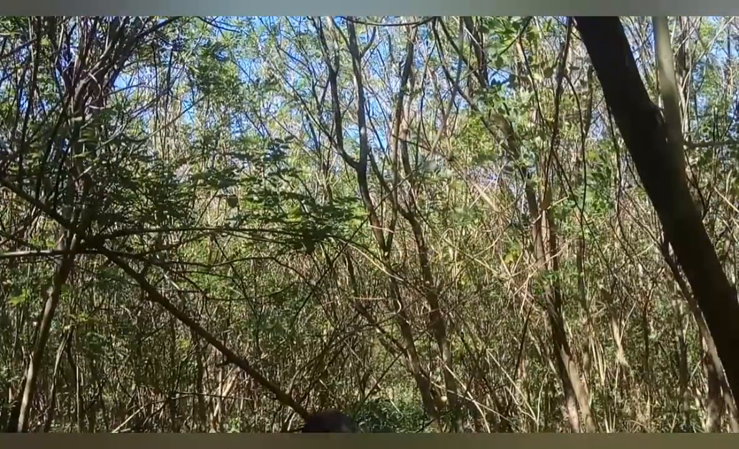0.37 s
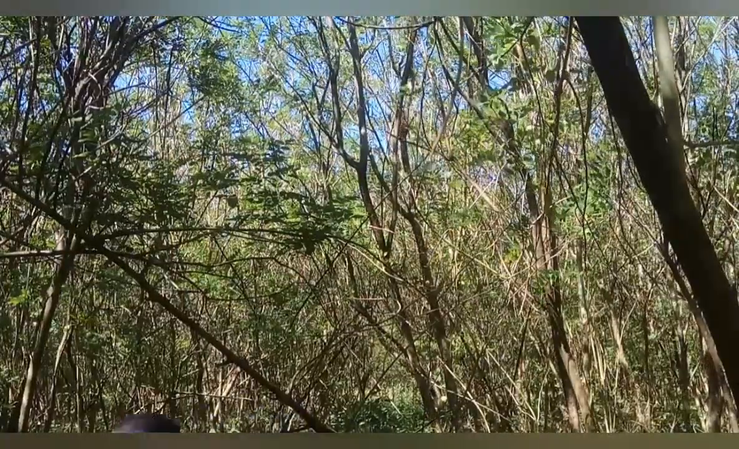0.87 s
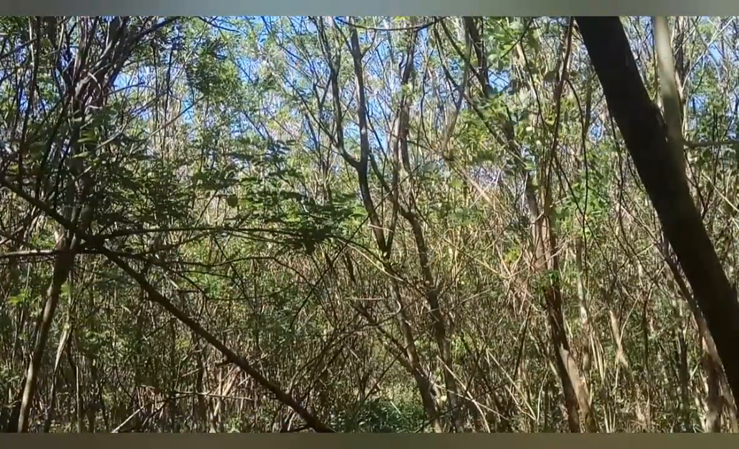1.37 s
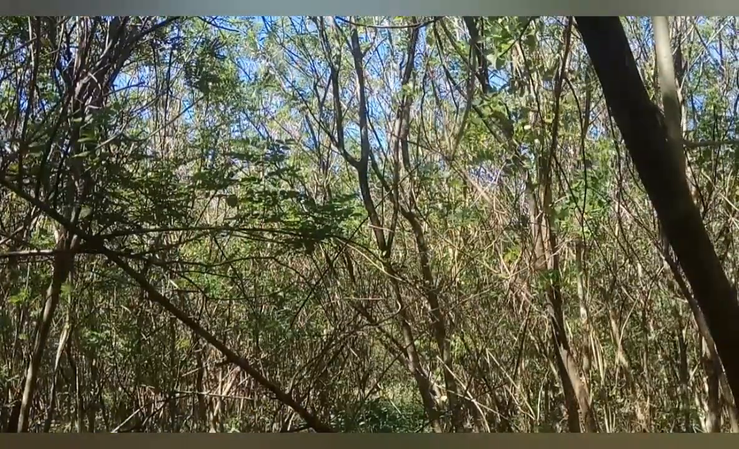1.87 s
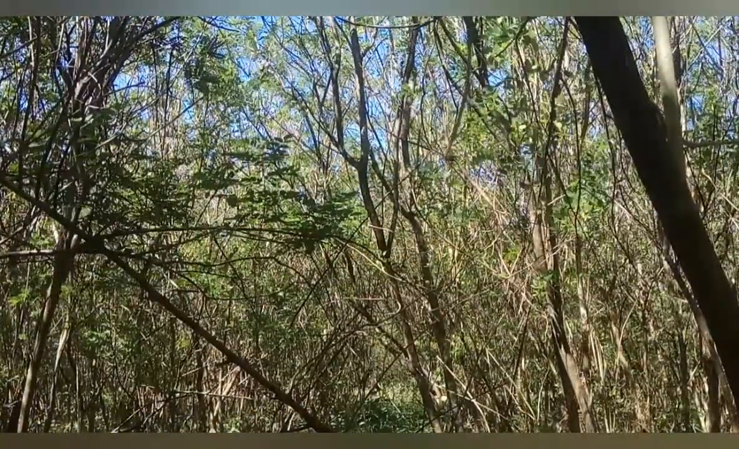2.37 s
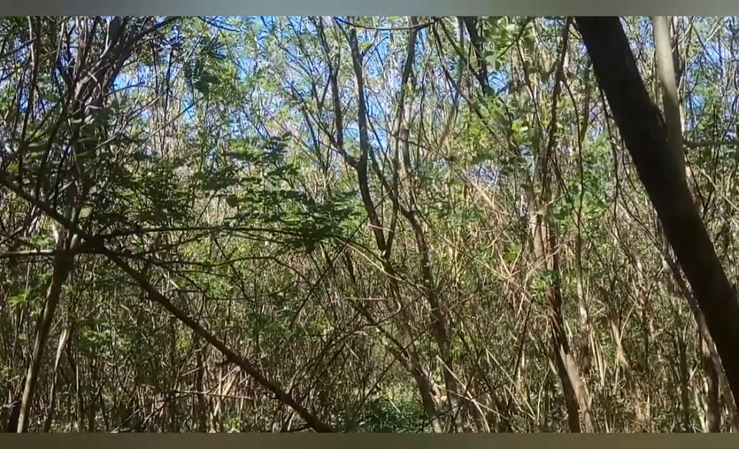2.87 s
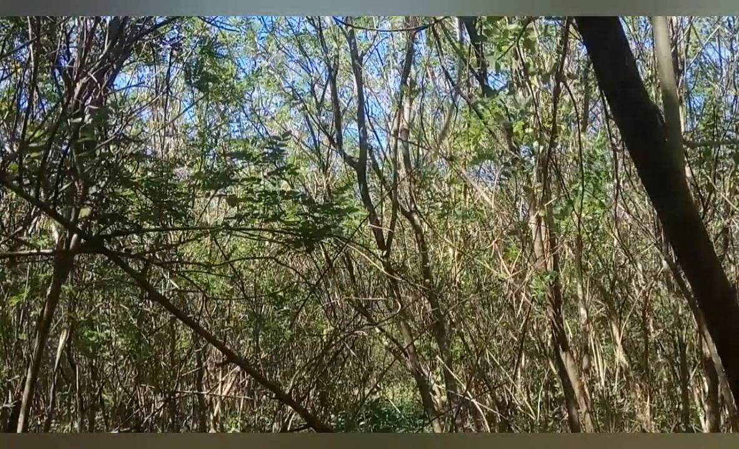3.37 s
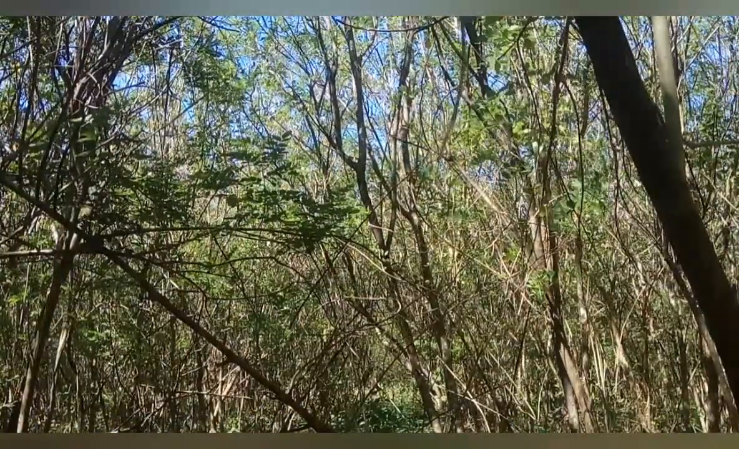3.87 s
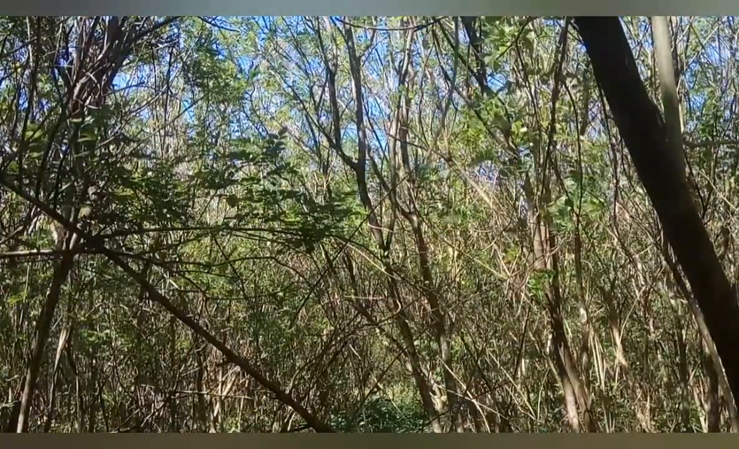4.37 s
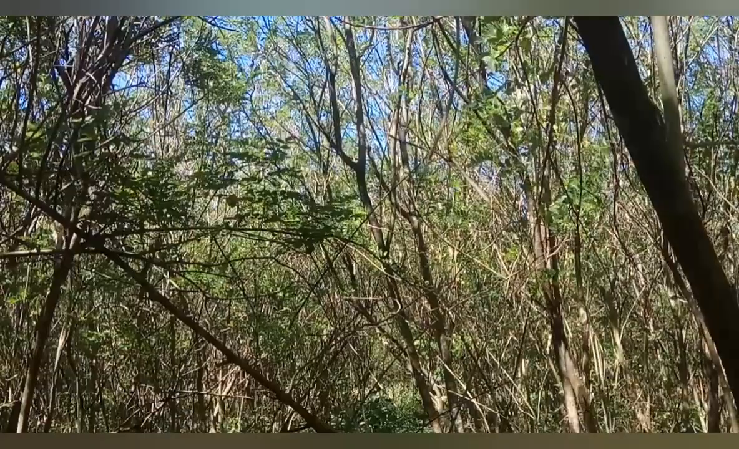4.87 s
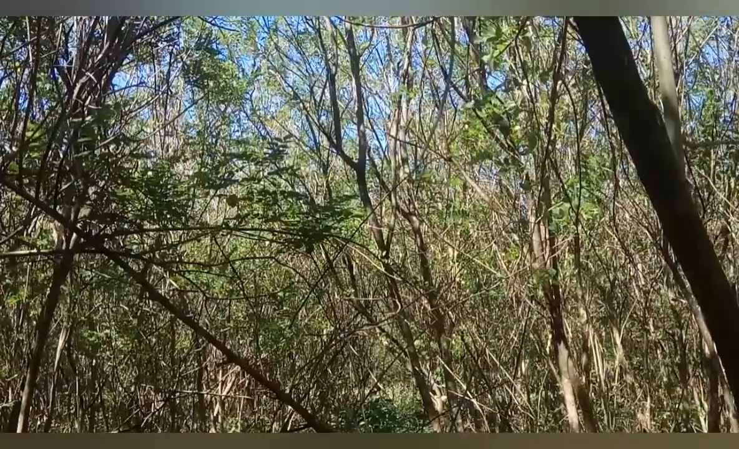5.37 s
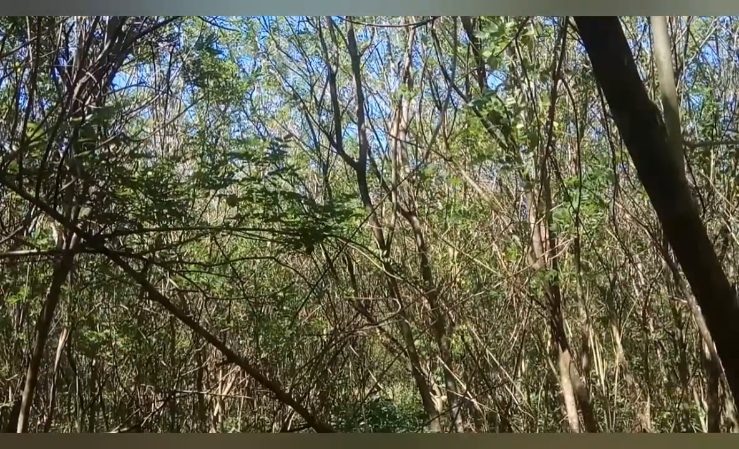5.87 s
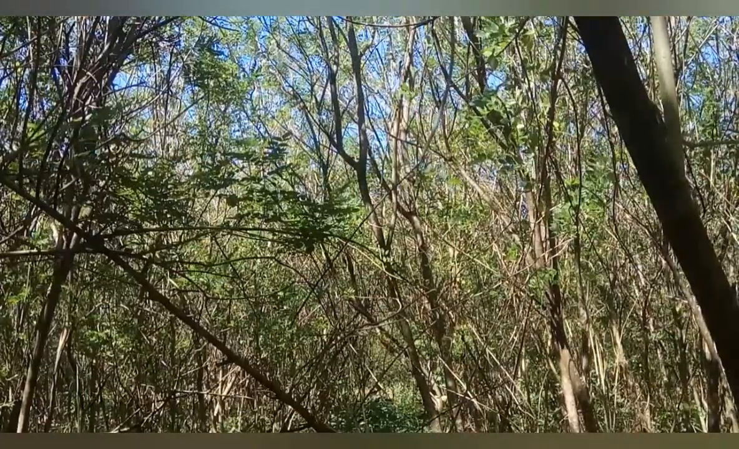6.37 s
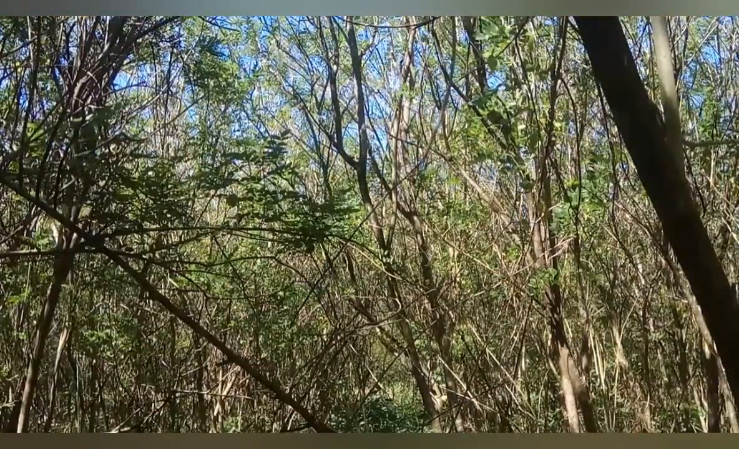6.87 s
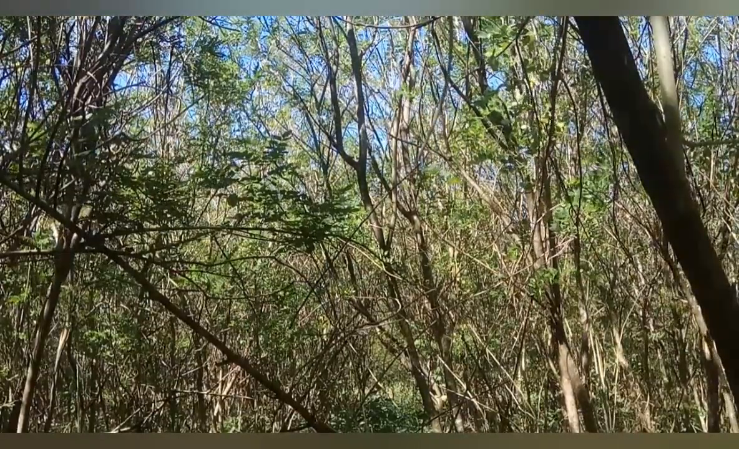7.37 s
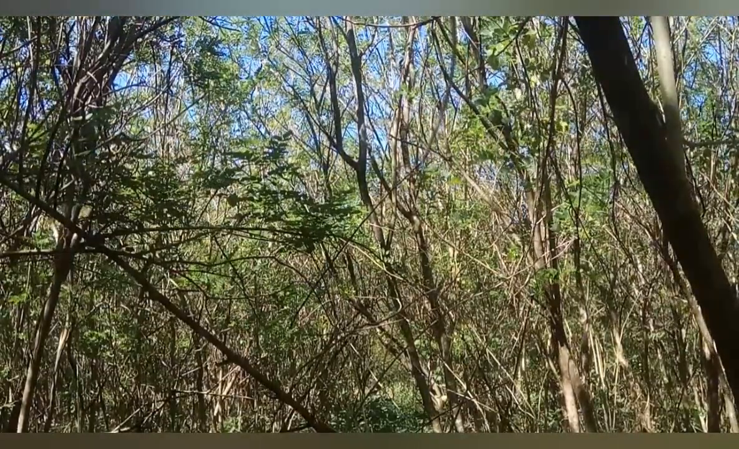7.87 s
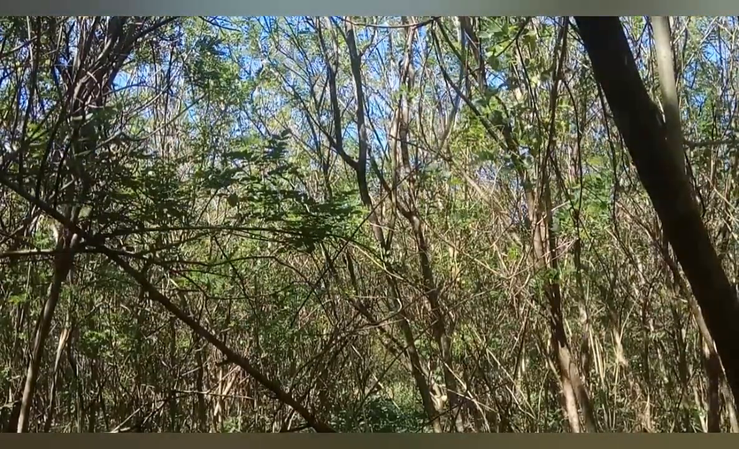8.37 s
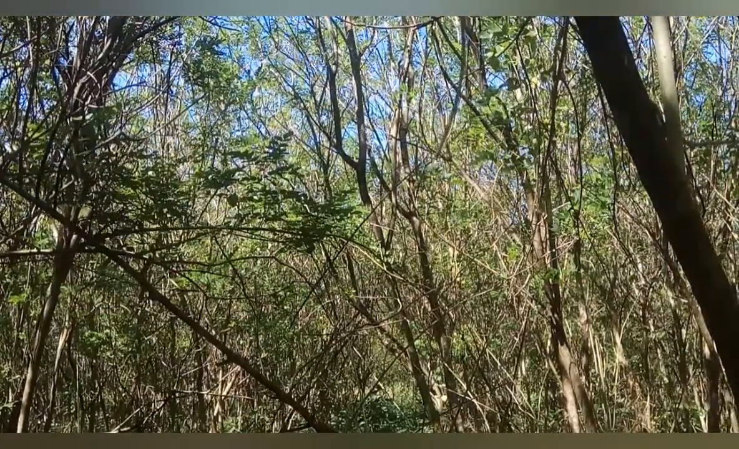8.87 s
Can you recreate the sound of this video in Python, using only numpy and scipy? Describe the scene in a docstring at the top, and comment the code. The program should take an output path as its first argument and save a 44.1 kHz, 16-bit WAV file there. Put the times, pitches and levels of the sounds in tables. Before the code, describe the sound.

Many small songbirds chatter in dense buzzy trills and clear bending whistles, over faint insect hiss, rustling leaves, snapping twigs and a distant engine.

```python
"""Songbirds in a thicket, heard by two microphones, the left a little first.
From the start, buzzy trills (fast-swept tones, breath and tiny chirps) chatter over faint insect hiss, a far
engine built from orders of its firing rate, and coloured noise for the air. At once clear gliding sine
whistles and chips join in, then leaves stir in bursts of crackling noise. Twigs snap as short decaying tones
from 2.6 s on; at 6.4 s one low rattling call of even notes is heard."""
import sys
import numpy as np
from scipy import signal
from scipy.fft import rfft, irfft, next_fast_len
from scipy.io import wavfile
from scipy.ndimage import uniform_filter1d, map_coordinates

SR = 44100
rng = np.random.default_rng(int(sys.argv[2]) if len(sys.argv) > 2 else 0)


def unload_wav(signal):
    """Save mono or channel-first audio to the path in sys.argv[1] as 16-bit WAV at rate SR, clipped to [-1, 1]."""
    wavfile.write(
        sys.argv[1],
        SR,
        np.round(np.clip(np.atleast_2d(signal).T, -1, 1) * 32767).astype(np.int16),
    )


def makeup_ratio(level_db):
    """Linear amplitude ratio for a level in decibels (20 dB per factor of ten)."""
    decades = np.asarray(level_db, float) / 20
    return 10 ** decades


N = 407484   # length [samples]

# phrases of evenly spaced buzzy syllables:
# (start [s], syllables [count], period [s], high voice level [dB], low voice level [dB])
PHRASES = [(.002, 2, 0.091, -32, -33.5), (0.213, 1, 0.14, -22.5, -29.5), (0.372, 2, .1, -27.5, -25),
           (.574, 5, 0.11, -24.5, -25), (1.164, 3, 0.11, -26.5, -28), (1.64, 1, 0.14, -30.5, -28),
           (1.859, 6, 0.12, -30.5, -29.5), (2.519, 7, 0.11, -26, -29), (3.27, 3, 0.12, -26.5, -24.5),
           (3.655, 5, 0.11, -27, -28), (4.205, 2, .1, -26.5, -27.5), (4.457, 3, 0.1, -24, -31),
           (4.798, 4, 0.11, -28.5, -29), (5.225, 1, 0.086, -31, -32), (5.334, 3, 0.12, -25.5, -29.5),
           (5.72, 6, 0.11, -22.5, -29), (6.406, 6, 0.12, -28.5, -27), (7.099, 1, .12, -28, -38.5),
           (7.2, 1, 0.092, -50, -30), (7.462, 4, 0.11, -29, -32), (7.915, 2, 0.1, -28, -29),
           (8.192, 1, 0.066, -49, -28.5), (8.353, 1, 0.15, -31.5, -34.5), (8.46, 4, 0.094, -26.5, -27.5),
           (8.912, 1, 0.12, -24.5, -23.5), (9.06, 1, 0.14, -27, -27), (9.194, 1, 0.079, -24.5, -27)]
# spectra of the two trilling voices: (frequency [Hz], density [dB per Hz])
HIGH_TRILL_COLOUR = [(5000, -2), (5600, 2.5), (6000, 4), (6500, 2.5), (6950, -1.5), (7150, -10),
                     (7600, -15), (7800, -89)]
LOW_TRILL_COLOUR = [(1800, -21), (2600, -10.5), (3300, -2), (4200, 0), (4600, 2), (5100, 0), (5600, -1.5),
                    (6400, -8)]
# air spectrum: (frequency [Hz], density [dB per Hz])
AIR_COLOUR = [(25, -12.5), (80, -1), (150, 4.5), (400, 3.5), (800, -12.5), (1500, -14.5), (3000, -26),
              (7300, -2), (7700, -52)]
# air loudness: (time [s], level [dB])
AIR_LEVEL = [(0, -42), (4.5, -48.5), (5.3, -47.5), (7.5, -51.5), (9.24, -43)]
# engine: (time [s], firing rate [Hz], low thrum level [dB], upper orders level [dB])
ENGINE = [(0, 59.8, -43, -39), (.7, 62.9, -46, -44), (.92, 63.26, -59, -49), (1.15, 66.4, -41, -49),
          (1.35, 66.95, -55, -47), (1.7, 53.87, -62, -57.5), (2.05, 54.7, -49.5, -50.5),
          (3.5, 53.72, -46, -54), (4.9, 51.33, -49.5, -56), (5.25, 50.44, -72, -67),
          (6.15, 49.15, -49, -49), (7, 49.8, -53.5, -50.5), (7.55, 49.15, -59.5, -60.5),
          (7.92, 49.06, -52.5, -43.5), (9.24, 52.62, -47.5, -40)]
# exhaust resonance: (frequency [Hz], level [dB])
EXHAUST_COLOUR = [(40, -27), (150, -19.5), (200, -13), (300, -11.5), (400, -3.5), (470, -16), (700, -23.5)]
# steady insect hiss: (time [s], level [dB])
INSECTS = [(0, -43), (2, -45.5), (4.3, -46.5), (4.5, -52.5), (6.7, -45.5), (7, -51.5), (9.24, -51)]
# leaves stirred: (time [s], level [dB])
LEAF_STIRS = [(0.49, -44), (.905, -55), (1.973, -53), (2.549, -38), (2.947, -41), (3.154, -42.5),
              (3.681, -36), (3.77, -41.5), (3.863, -42), (4.089, -42), (4.211, -36.5), (4.99, -42),
              (6.051, -42), (6.71, -55), (7.8, -53), (7.92, -60), (8.47, -53), (8.92, -61), (9.174, -37)]
# spectrum shared by insects and leaves: (frequency [Hz], density [dB per Hz])
RUSTLE_COLOUR = [(500, -2), (1200, -2), (3000, 3.5), (7400, 0), (8200, -3), (9300, 2), (13300, -2),
                 (13800, -29), (14500, 9.5), (15400, 10), (15900, -75)]
# repeated whistled notes: (time of the mark [s], level [dB], pitch factor [ratio])
HOOKS = [(.027, -24, 0.99), (.217, -25.5, 1.0), (.41, -26, 1), (4.972, -24, 0.98), (5.171, -24, .994),
         (5.354, -25.5, 1.0), (5.56, -24, 1.0)]
ARCHES = [(1.445, -22.5, 1.02), (2.43, -19.5, 1.02), (5.17, -22.5, 1.05), (7.05, -27.5, .995),
          (7.905, -20, 1.043)]
# their shapes: (time from the mark [s], frequency [Hz], level [dB])
HOOK_SHAPE = [(0, 6500, 0.5), (.01, 6900, 2), (0.02, 7100, 1), (0.034, 7200, 0), (0.048, 7130, -1),
              (0.06, 6850, -2)]
ARCH_SHAPE = [(-.11, 3150, -5), (-.07, 3400, -4), (-.045, 3750, -2), (-.02, 3960, 0), (0, 4040, 1),
              (0.04, 3930, 0), (0.08, 3800, -3), (.12, 3680, -8)]
# chips: (time of the top [s], level [dB])
CHIPS = [(.17, -31), (1.207, -34), (1.457, -37), (1.72, -30.5), (2.006, -30), (2.246, -31), (3.063, -27.5),
         (3.334, -36), (3.615, -29), (3.86, -32), (4.422, -26), (4.679, -29), (4.918, -33), (5.158, -32),
         (5.951, -32), (6.44, -35), (6.99, -34.5), (7.232, -30.5), (7.574, -31), (7.828, -29),
         (8.208, -30.5), (8.466, -31)]
# a chip's rise, the octave over it and the fall: (time from the top [s], frequency [Hz], level [dB])
CHIP_RISE = [(-.035, 2160, -25), (-.02, 2483, -12), (-.01, 2680, -6.5)]
CHIP_OCTAVE = [(-.037, 4200, 5), (-.022, 4830, 5.9), (-.011, 5320, 4)]
CHIP_FALL = [(0, 4700, -2), (.012, 3400, -4)]
# gliding whistles: (start [s], length [s], start pitch [Hz], end pitch [Hz], level [dB])
GLIDES = [(0.287, 0.11, 4700, 5180, -26.5), (0.464, 0.056, 4000, 4160, -29.5),
          (1.098, 0.053, 5970, 6300, -34), (1.114, 0.14, 4530, 5096, -27), (1.19, 0.023, 6000, 6540, -38),
          (1.332, 0.021, 6300, 6930, -41), (1.29, 0.037, 3800, 4180, -26), (1.378, 0.04, 6370, 6440, -24.5),
          (2.077, 0.13, 5000, 5160, -29.5), (2.188, 0.13, 3470, 4130, -31),
          (2.299, 0.081, 4700, 5130, -34.5), (1.798, 0.063, 4000, 3900, -44),
          (2.414, 0.058, 4705, 5120, -24), (2.46, 0.13, 4980, 4370, -25.5), (2.408, .12, 3400, 3250, -43),
          (2.653, 0.089, 6620, 7150, -24.5), (2.78, 0.078, 3460, 3300, -33.5),
          (2.872, 0.064, 6380, 6930, -23.5), (3.455, 0.041, 2890, 3290, -28.5),
          (3.5, 0.015, 3500, 3300, -28), (3.56, 0.029, 3480, 3590, -32.5),
          (3.557, 0.091, 2763, 3050, -31.5), (3.642, 0.0096, 3400, 3260, -14.5),
          (3.659, 0.086, 6070, 6900, -27), (3.845, 0.16, 4580, 5135, -29), (4.163, 0.16, 3920, 3670, -29.5),
          (4.504, 0.022, 6490, 6820, -21), (4.528, 0.057, 6920, 5650, -17.5),
          (4.877, 0.075, 4610, 5040, -26), (6.065, 0.065, 6670, 7050, -28.5),
          (5.958, 0.049, 4170, 4263, -22), (6.122, 0.073, 3977, 3870, -27), (6.249, 0.077, 6380, 6725, -33),
          (6.549, 0.035, 6030, 6440, -24), (6.772, 0.032, 6300, 6750, -24.5),
          (6.944, 0.047, 5960, 6730, -27.5), (7.586, 0.14, 4630, 5260, -25), (7.351, .07, 3720, 4660, -35),
          (7.417, .045, 4660, 4350, -38), (7.342, .11, 1900, 2383, -52.5), (7.559, 0.051, 5810, 6300, -32),
          (7.703, 0.052, 3430, 3610, -28), (7.756, 0.037, 3840, 4123, -22),
          (8.205, 0.054, 6320, 6440, -27.5), (8.402, 0.039, 6300, 6466, -27),
          (8.487, 0.13, 4430, 5297, -29.5), (8.552, 0.032, 6200, 6560, -24),
          (8.596, 0.048, 3400, 3620, -40), (8.63, 0.046, 4180, 4200, -35), (8.611, 0.039, 6654, 6800, -26),
          (8.701, .11, 4050, 3840, -33.5), (8.797, 0.09, 6495, 7100, -26.5)]
# whistles that bow up and down again: (start [s], length [s], top pitch [Hz], level [dB])
BOWS = [(1.771, 0.16, 6050, -37.5), (3.27, 0.11, 3900, -25.5), (6.517, 0.18, 4900, -23.5),
        (6.511, 0.18, 1630, -54)]
# two loud single whistles: (time [s], frequency [Hz], level [dB])
DROP = [(4.76, 6000, -22), (4.78, 6180, -21.5), (4.8, 5760, -18.5), (4.83, 5075, -26), (4.86, 4770, -29)]
SWOOP = [(8, 4150, -31), (8.059, 4710, -27.5), (8.131, 5854, -18.5), (8.159, 6360, -21), (8.182, 6510, -16)]
# snapping twigs: (time [s], level [dB], frequency [Hz])
SNAPS = [(2.563, -42, 1592), (2.786, -32, 1230), (2.948, -17, 680), (3.214, -20.5, 920),
         (4.247, -28.5, 620), (9.177, -16.5, 1004)]
# low rattling call: (start [s], end [s], frequency [Hz], note rate [per s], level [dB])
RATTLE = (6.43, 6.9, 3200, 38, -28)

LAG_SAMPLES = 6   # the right side hears later
SYLLABLE_SHARE, SYLLABLE_SPREAD_DB = .66, 1.4   # sounding part of a period; chance in strength
FAR_CHORUS_DB = -46   # floor of the chatter: never quite silent
THROB_DB, THROB_PER_S = 1.6, 80   # at times the buzz comes in separate pulses
AIR_SWELL_DB = 1.8
ORDERS_DB = 5   # strength of the upper orders over the exhaust colour
STIR_HOLD_S, STIR_T60_S = 0.042, 0.18
GLIDE_CURL, HIGH_CURL = 2.5, .9   # power law of the bend; high glides run nearly straight
HIGH_BIRD_HZ = 6300   # glides that start above this count as high
NOTE_ENDS_DB = -1.5   # level at both ends of a note
BOW_SAG = 0.12   # share of the top pitch lost at both ends


def at_hz(points, hz):
    """Read a spectrum on a log frequency axis; silent beyond its ends."""
    f, level_db = np.transpose(points)
    return np.interp(np.log(hz + 1), np.log(f), level_db, -120, -120)


def in_time(rows):
    """Spread the columns of a curve over every sample."""
    s, *columns = np.transpose(rows)
    return [np.interp(np.arange(N) / SR, s, c) for c in columns]


def coloured(x, points):
    """Filter by a spectrum, then bring the rms of the channel mean to 1."""
    size = next_fast_len(N)
    gain = makeup_ratio(at_hz(points, np.arange(size // 2 + 1) * SR / size))
    y = irfft(rfft(x, size) * gain, size)[..., :N]
    return y / np.std(np.atleast_2d(y).mean(axis=0))


def drift(rate):
    """Smooth chance of spread about 1, with `rate` new values per second."""
    knots = rng.standard_normal(int(60 * N / SR) + 3)
    place = np.arange(N) * np.clip(rate, .1, 59) / SR
    return map_coordinates(knots, [place], order=2) * 1.2


def pair(x, other, apart, pan_db):
    """Two microphones: the right hears later, and an unrelated sound enters with opposite signs."""
    left = (x + apart * other) * makeup_ratio(pan_db / 2)
    right = np.roll(x - apart * other, LAG_SAMPLES) * makeup_ratio(-pan_db / 2)
    return np.array([left, right])


def foliage(x, t60):
    """Trunks and leaves scatter the sound into a short noisy tail."""
    t = np.arange(int(.4 * SR)) / SR
    tail = rng.standard_normal(len(t)) * makeup_ratio(-60 * t / t60) * (t > .003)
    return signal.fftconvolve(x, tail / np.sqrt(np.sum(tail ** 2)))[:N]


def syllables(voice):
    """Unroll the phrases of one voice into syllables: (start [s], length [s], level [dB])."""
    return [(start + k * period, SYLLABLE_SHARE * period, levels_db[voice])
            for start, count, period, *levels_db in PHRASES for k in range(round(count))]


def twitter(centre_hz, spread_hz, per_s):
    """Back-to-back tiny chirps, each with its own pitch, slope and strength."""
    clock = np.cumsum(per_s * makeup_ratio(2.0 * drift(20))) / SR
    chances = rng.standard_normal((int(200 * N / SR), 3))
    pitch, slope, strength = chances[clock.astype(int)].T
    phase = clock % 1
    hz = centre_hz + spread_hz * (pitch + (1.0 + 1.293 * slope) * (phase - .5))
    return np.sin(2 * np.pi * np.cumsum(hz) / SR) * np.sin(np.pi * phase) * makeup_ratio(2.0 * strength)


def trill(rows, colour, centre_hz, swing_hz, pulse_hz, hiss):
    """Sharp-edged syllables of a fast-swept tone and breath, pulsing together, with tiny chirps."""
    level, pitch = np.full(N, makeup_ratio(FAR_CHORUS_DB)), np.zeros(N)
    for (start, length, level_db), chance in zip(rows, rng.standard_normal((len(rows), 3))):
        t = np.arange(round((max(length, .02) + .03) * SR)) / SR
        fade_db = -8.0 * t - 83 * np.maximum(t - length, 0)
        shape = np.minimum(t / 0.0062, 1) * makeup_ratio(fade_db + level_db + SYLLABLE_SPREAD_DB * chance[2])
        first = round(start * SR)
        span = slice(first, min(first + len(t), N))
        room = span.stop - span.start
        level[span] = np.maximum(level[span], shape[:room])
        pitch[span] = (chance[0] + 6 * chance[1] * t)[:room]
    # farther birds fill the pauses
    level = np.maximum(level, 0.5 * uniform_filter1d(level, size=6000))

    beat = 2 * np.pi * np.cumsum(pulse_hz * (1 + .3 * drift(50))) / SR
    hz = centre_hz * (1 + .035 * pitch) + swing_hz * np.sin(beat) * (1 + 0.374 * drift(40))
    voice = np.sin(2 * np.pi * np.cumsum(hz) / SR) + hiss * rng.standard_normal(N)
    pulsed = voice * (1 + 0.22 * np.cos(beat))
    chirps = twitter(centre_hz, 400, 35) + twitter(centre_hz, 400, 55)

    throb = np.sin(2 * np.pi * np.cumsum(THROB_PER_S * (1 + 0.14 * drift(15))) / SR)
    throb_db = THROB_DB * np.minimum(np.abs(drift(8)), 2) * throb
    buzz = (pulsed + 1.3 * chirps) * makeup_ratio(1.6 * drift(35) + throb_db)
    out = level * coloured(buzz, colour)
    return out + 0.49 * foliage(out, 0.095), foliage(out, 0.17)


def air():
    """Broad coloured noise that swells slowly, its long waves alike on both sides."""
    same, other = rng.standard_normal((2, N))
    other -= uniform_filter1d(other, size=40)   # only short waves differ
    level = makeup_ratio(in_time(AIR_LEVEL)[0] + AIR_SWELL_DB * drift(6.8))
    return level * coloured(pair(same, other, 1.0, 3.5), AIR_COLOUR)


def engine():
    """Orders of the firing rate, each fading in the moving air, and a puff of noise per firing."""
    firing_hz, thrum_db, upper_db = in_time(ENGINE)
    turn = 2 * np.pi * np.cumsum(firing_hz * (1 + 0.00204 * drift(6))) / SR
    out = np.sqrt(2) * makeup_ratio(thrum_db + 2.2 * drift(14.0)) * np.sin(2 * turn)
    for k in range(3, 14):
        order_db = upper_db + at_hz(EXHAUST_COLOUR, k * firing_hz) + ORDERS_DB + 3.0 * drift(5)
        out += makeup_ratio(order_db) * np.sin(k * turn + 0.3 * drift(8))
    puffs = coloured(rng.standard_normal(N) * (1 + 0.69 * np.sin(turn)), EXHAUST_COLOUR)
    return out + makeup_ratio(upper_db - 9.5) * puffs


def insects_and_leaves():
    """Hiss strewn with dense small crackles: insects hold it up, stirred leaves lift it in bursts."""
    crackles = (rng.random(N) < 1500 / SR) * makeup_ratio(4.54 * np.minimum(rng.exponential(1, N), 4))
    grains = rng.standard_normal(N) * (1 + 2.0 * crackles)
    both = coloured(pair(grains, rng.standard_normal(N), 1.0, 0.99), RUSTLE_COLOUR)
    t, level = np.arange(N) / SR, makeup_ratio(in_time(INSECTS)[0])
    for s, peak_db in LEAF_STIRS:
        fade_db = -60 * np.clip(t - s - STIR_HOLD_S, 0, 2) / STIR_T60_S
        level += np.clip((t - s) / 0.00055, 0, 1) * makeup_ratio(peak_db + fade_db)
    return both * level * makeup_ratio(2.0 * drift(30) + 2.5 * drift(9))


def add_note(out, at_s, shape, level_db, pitch=1):
    """Add a sine that follows the pitch and level of a shape, with soft ends."""
    s, hz, shape_db = np.transpose(shape)
    t = np.arange(s[0], s[-1], 1 / SR)
    ends = np.clip(np.minimum(t - s[0], s[-1] - t) / 0.001, 0, 1)
    glide_hz = uniform_filter1d(np.interp(t, s, hz), size=90) * pitch
    level = np.sqrt(2) * ends * makeup_ratio(level_db + np.interp(t, s, shape_db))
    tone = level * np.sin(2 * np.pi * np.cumsum(glide_hz) / SR)
    i = max(round((at_s + s[0]) * SR), 0)
    out[i:i + len(t)] += tone[:N - i]


def whistles():
    """Clear notes of the nearer birds: bending sines whose level flutters."""
    out, u = np.zeros(N), np.linspace(0, 1, num=11)
    swell_db = NOTE_ENDS_DB * (2 * u - 1) ** 2
    for notes, shape in ((HOOKS, HOOK_SHAPE), (ARCHES, ARCH_SHAPE)):
        for s, level_db, pitch in notes:
            add_note(out, s, shape, level_db, pitch)
    for s, level_db in CHIPS:
        for part in (CHIP_RISE, CHIP_OCTAVE, CHIP_FALL):
            add_note(out, s, part, level_db)
    # glides: with the usual curl, flat at their top and steeper below
    for start, length, from_hz, to_hz, level_db in GLIDES:
        curl = HIGH_CURL if from_hz > HIGH_BIRD_HZ else GLIDE_CURL
        below_top = (1 - u if to_hz > from_hz else u) ** curl
        hz = max(from_hz, to_hz) - abs(to_hz - from_hz) * below_top
        add_note(out, start, np.transpose([u * length, hz, swell_db]), level_db)
    for start, length, top_hz, level_db in BOWS:
        hz = top_hz * (1 - BOW_SAG * (2 * u - 1) ** 2)
        add_note(out, start, np.transpose([u * length, hz, swell_db]), level_db)
    for shape in (DROP, SWOOP):
        add_note(out, 0, shape, 0)
    return out * makeup_ratio(2.2 * drift(58))


def snaps():
    """Twigs: each snap is one woody resonance, a sine that dies within milliseconds."""
    out = np.zeros(N)
    t = np.arange(1200) / SR
    for s, peak_db, hz in SNAPS:
        out[round(s * SR):][:len(t)] += makeup_ratio(peak_db - 60 * t / 0.0049) * np.sin(2 * np.pi * hz * t)
    return out


def rattle():
    """A call of short even notes around one slightly wavering pitch."""
    start, end, hz, per_s, level_db = RATTLE
    t = np.arange(N) / SR
    notes = np.maximum(np.sin(2 * np.pi * per_s * (t - start)), 0) ** 4 * (t > start) * (t < end)
    tone = np.sin(2 * np.pi * np.cumsum(hz * (1 + .012 * drift(50))) / SR)
    return makeup_ratio(level_db + 3.0 * drift(30)) * notes * tone


def scene():
    """All sources at the two microphones."""
    high = trill(syllables(voice=0), HIGH_TRILL_COLOUR, 6500, swing_hz=441.5, pulse_hz=240, hiss=1.2)
    low = trill(syllables(voice=1), LOW_TRILL_COLOUR, 4950, swing_hz=461.4, pulse_hz=200, hiss=1.8)
    chatter = pair(*high, 0.023, 0.09) + pair(*low, 0.45, 1.0)
    drone = engine()
    far = pair(drone, foliage(drone, 0.28), 0.3, 2.4)
    notes = whistles() + rattle()
    near = pair(notes + 0.2 * foliage(notes, 0.12), foliage(notes, 0.12), 0.16, 1.0)
    twigs = snaps()
    wood = pair(twigs, foliage(twigs, 0.12), 0.21, 1.4)
    return chatter + air() + far + insects_and_leaves() + near + wood


def top_cut(x):
    """Nothing passes above the cut-off."""
    return signal.sosfilt(signal.butter(12, 15850, fs=SR, output="sos"), x)


def record(dry):
    """Round off the peaks, softly limiting them to 0.62 of full scale."""
    mix = .62 * np.tanh(dry / .62)
    return top_cut(mix)


dry = scene()
out = record(dry)
unload_wav(out)
```